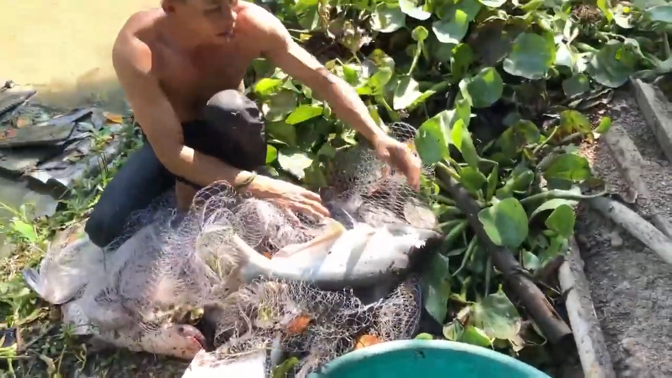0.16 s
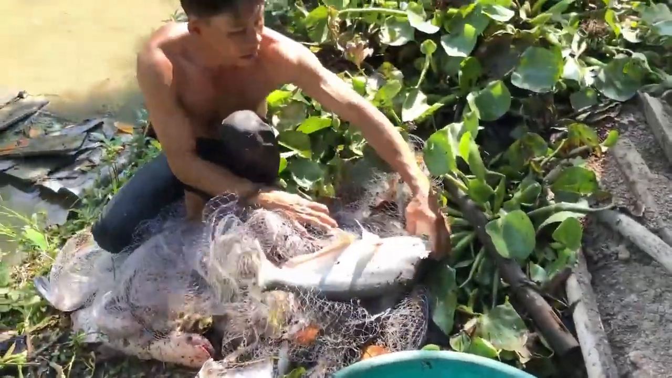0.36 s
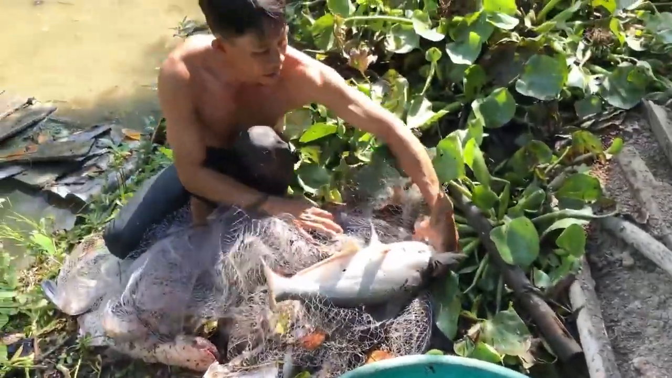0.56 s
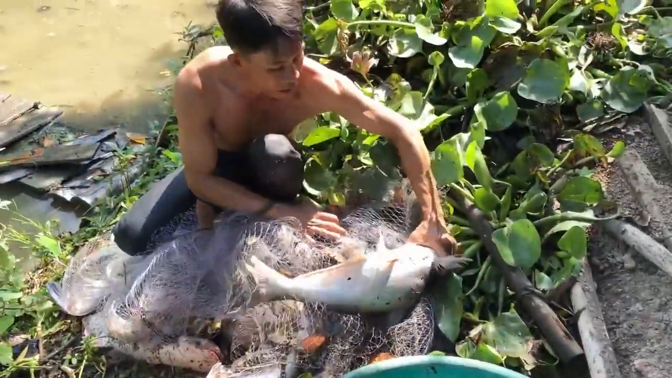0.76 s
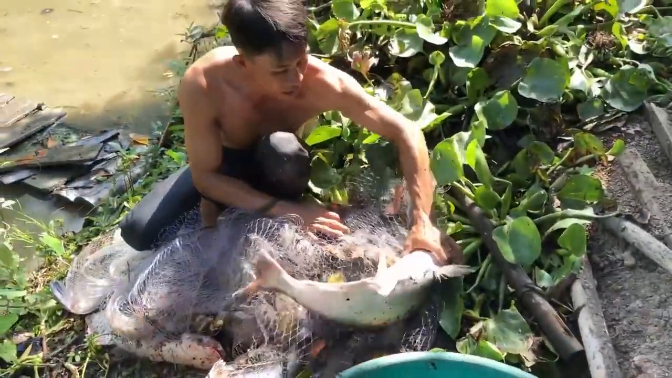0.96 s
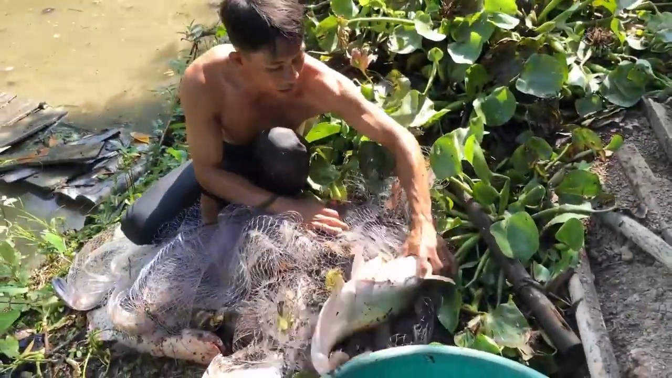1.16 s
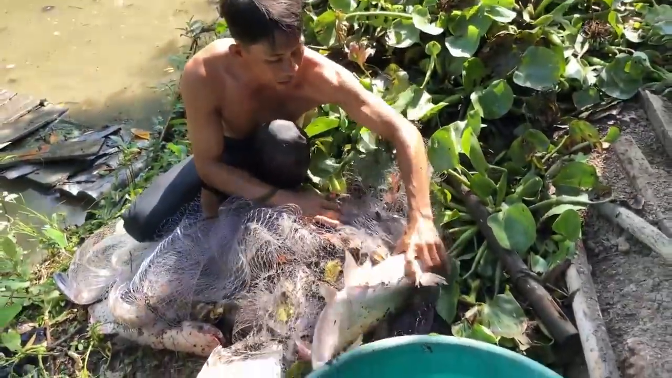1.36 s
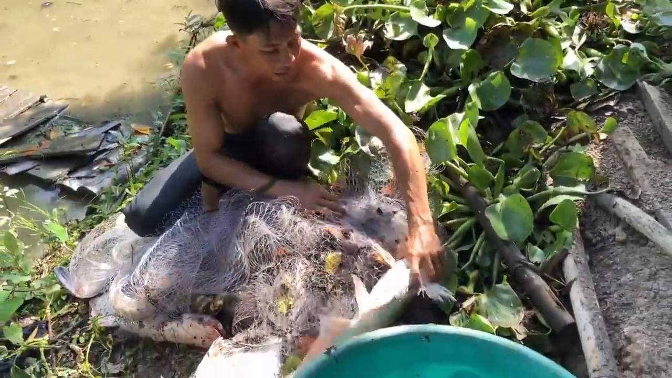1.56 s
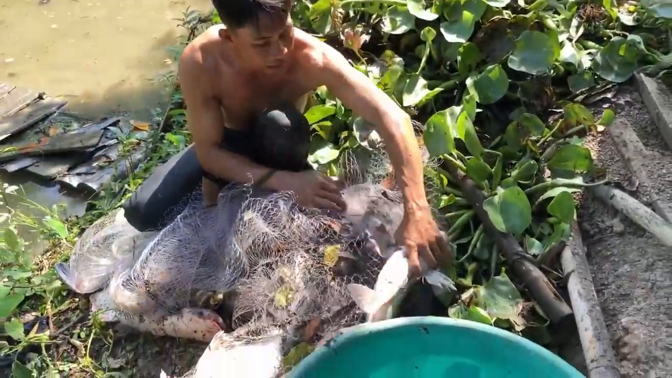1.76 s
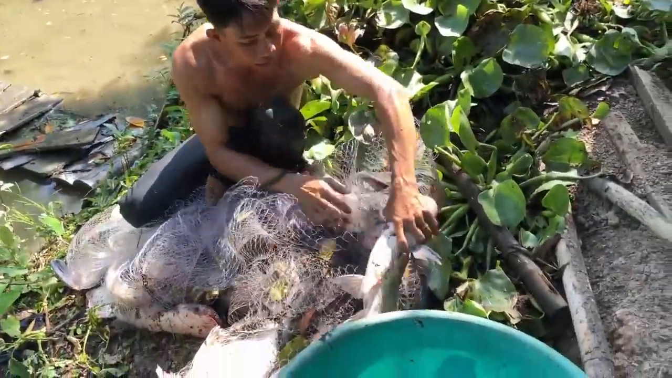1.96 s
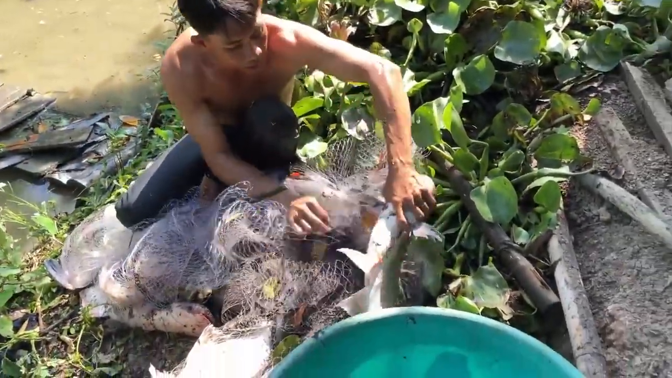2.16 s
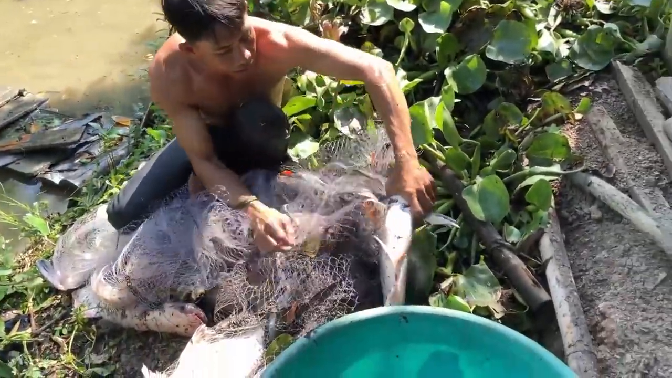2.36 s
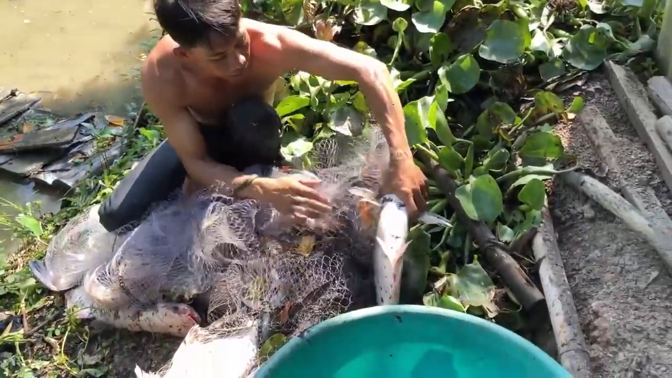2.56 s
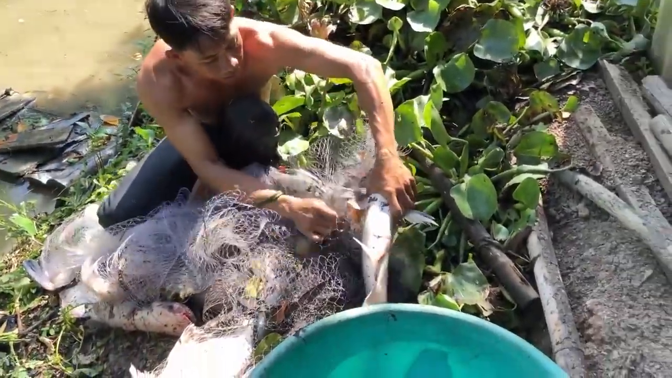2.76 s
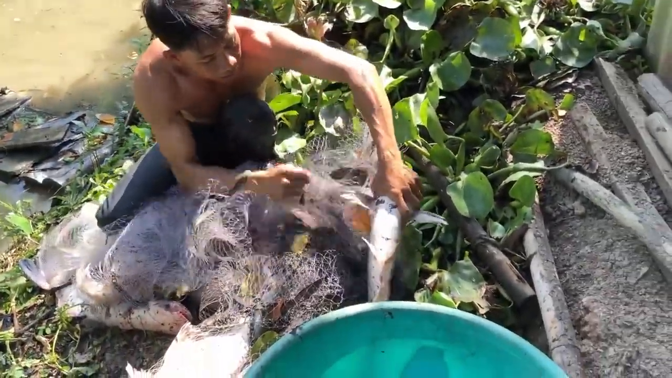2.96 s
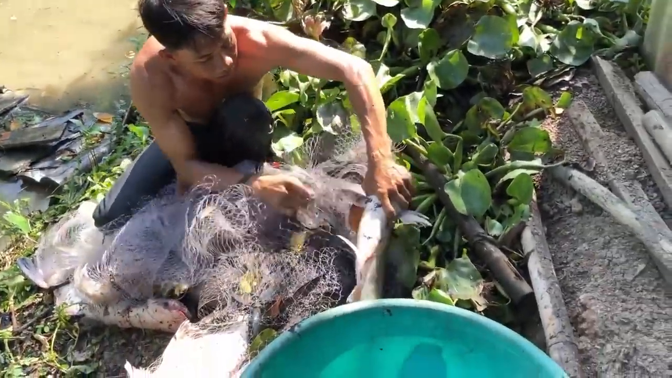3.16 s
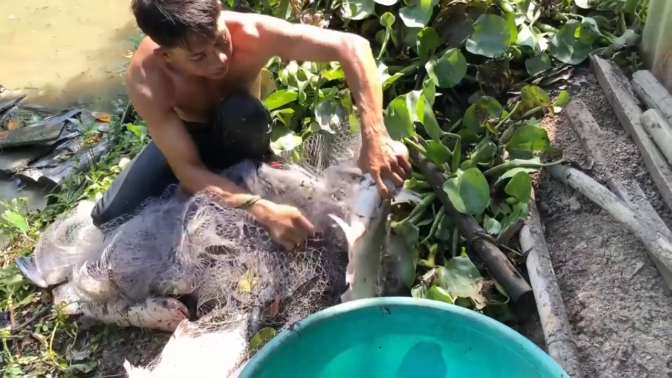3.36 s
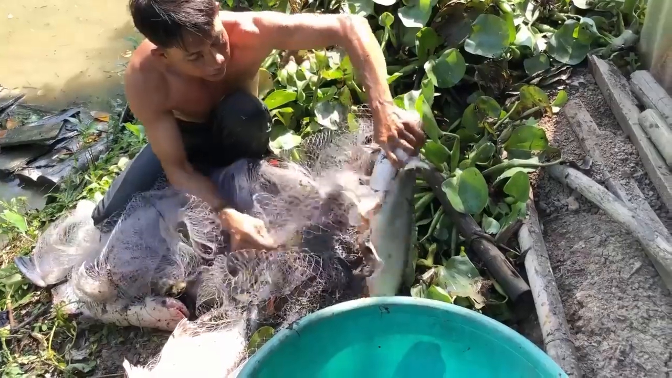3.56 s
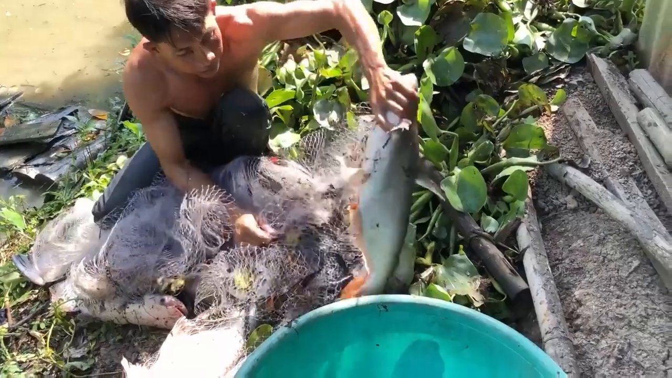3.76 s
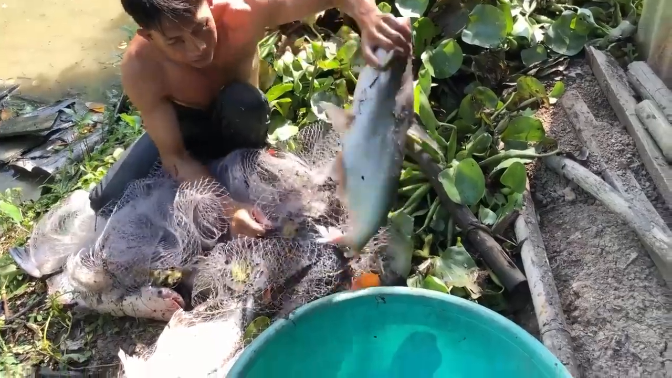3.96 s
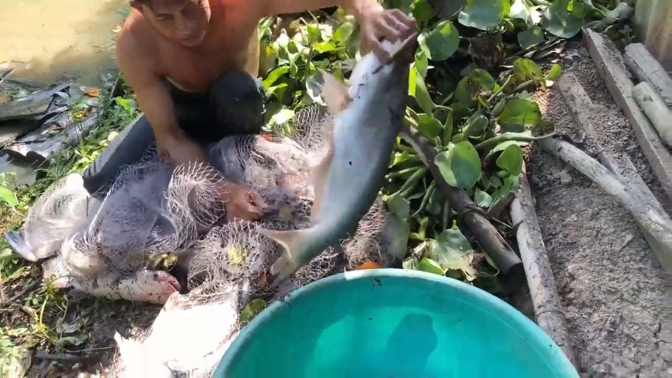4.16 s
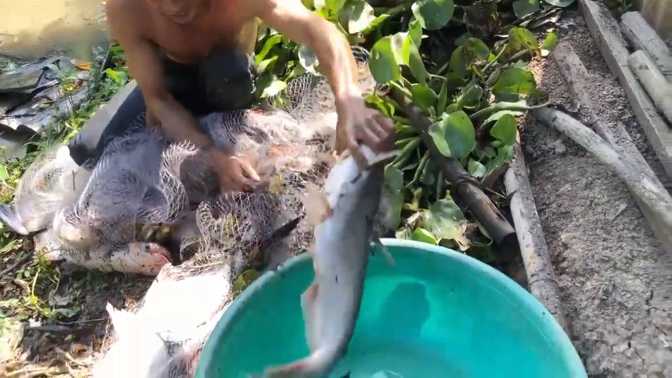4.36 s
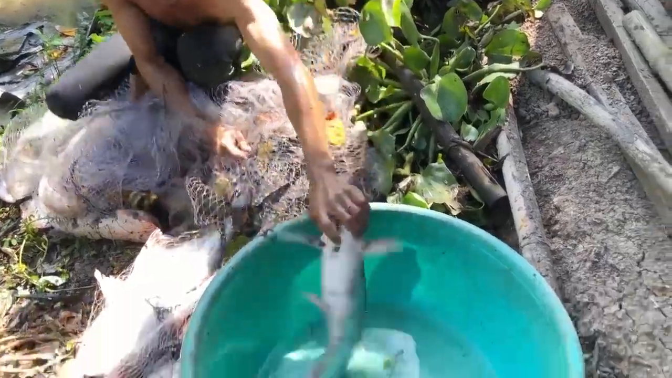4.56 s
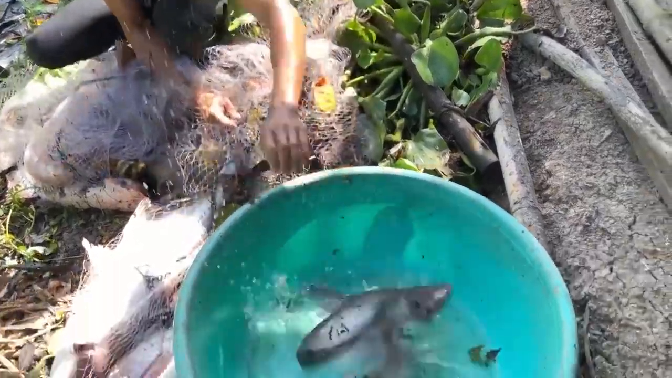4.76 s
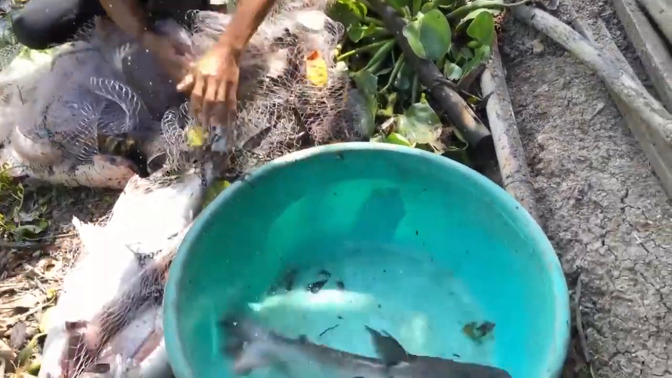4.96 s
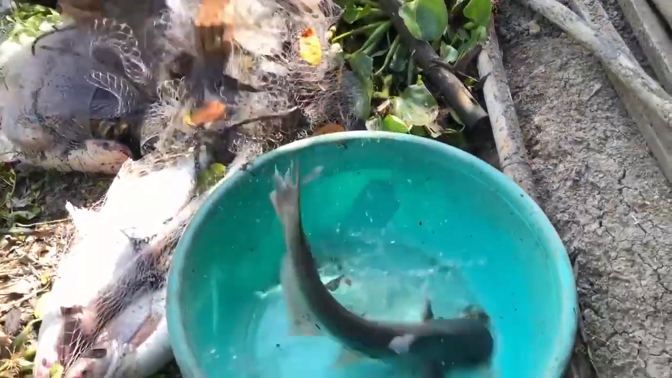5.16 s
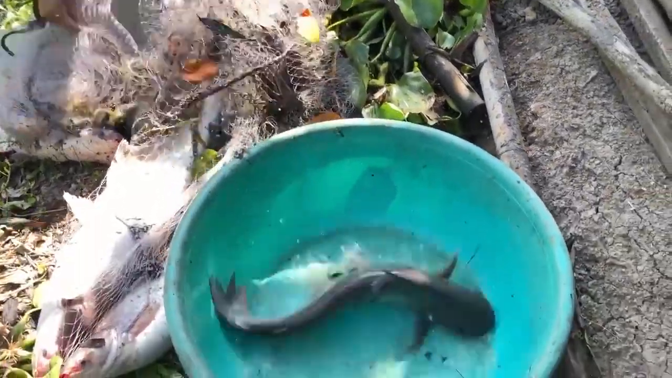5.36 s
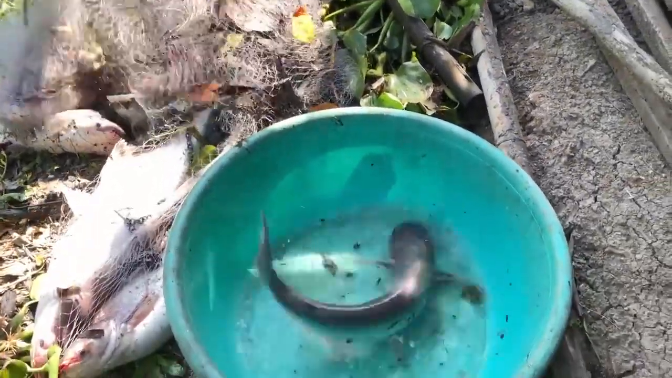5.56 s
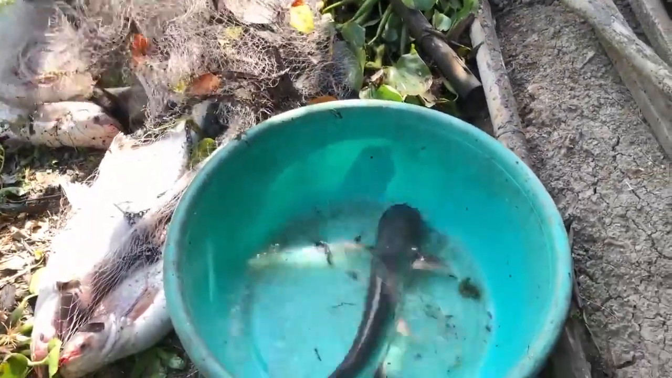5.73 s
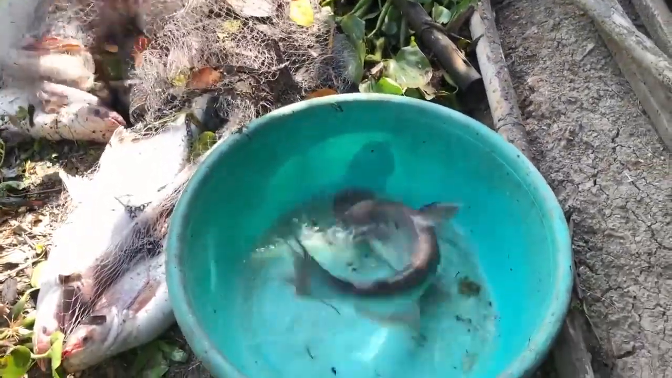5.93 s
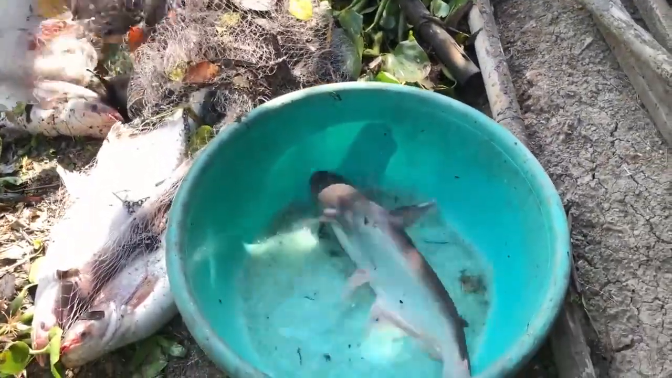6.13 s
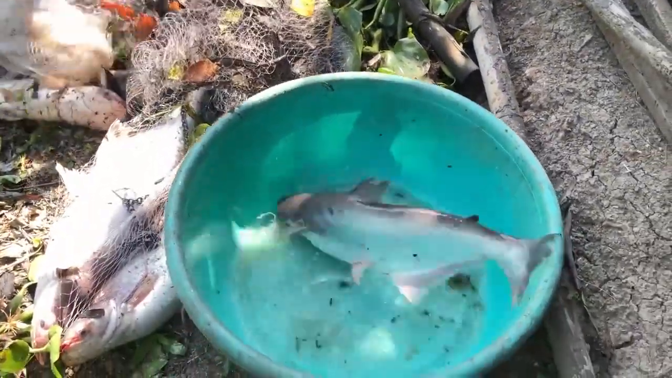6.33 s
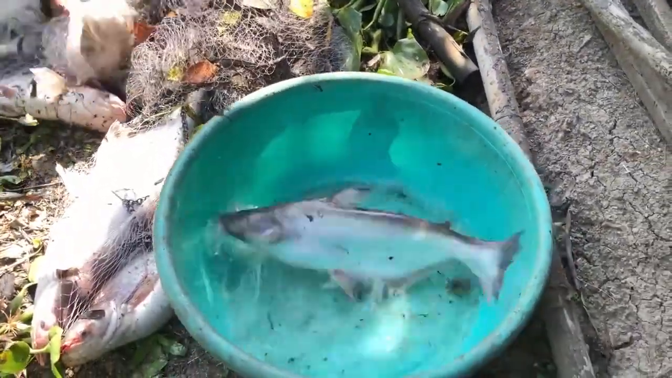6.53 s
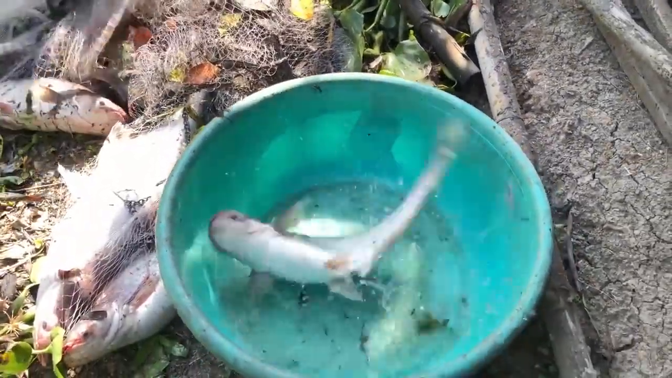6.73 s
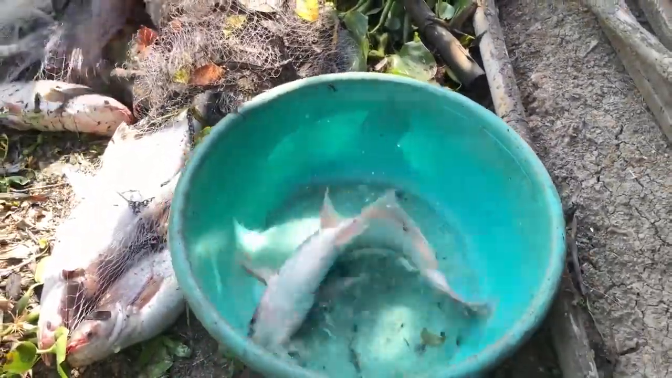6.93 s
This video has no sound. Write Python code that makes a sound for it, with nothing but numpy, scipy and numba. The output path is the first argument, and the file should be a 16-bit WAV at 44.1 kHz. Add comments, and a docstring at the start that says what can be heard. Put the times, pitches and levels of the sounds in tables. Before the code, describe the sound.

Fine crackling and ticks of a net being tugged, quite quiet, over soft open air and a chugging low engine across the water. Suddenly a large fish drops into a basin: a much louder crack, splash and hollow plastic thump. Wet slaps, bubbling spurts, hissing spray and body blows follow in uneven clusters, with brief lulls between, while the engine keeps pulsing beneath. The sound is close, dry and slightly rough at its peaks.

```python
"""A pond bank: a large fish is freed from a nylon net and dropped into a plastic basin with a little water.
The net is crackling noise with ringing snaps and dull flops; water is swarms of dying sinusoids, hiss and slaps.
Body blows and slosh ring the resonances of the basin as the fish thrashes.
Across the pond a single-cylinder boat engine picks up speed: exhaust puffs ring a pipe.
Open air, a distant low drone, a flickering treble shimmer and faint hoots lie around it."""
import sys
import numpy as np
from scipy import signal
from scipy.fft import rfft, irfft
from scipy.io import wavfile
from scipy.ndimage import uniform_filter1d
from numba import njit

SR = 44100
rng = np.random.default_rng(int(sys.argv[2]) if len(sys.argv) > 2 else 0)


def unload_wav(signal):
    """Save mono or channel-first audio to the path in sys.argv[1] as 16-bit WAV at rate SR, clipped to [-1, 1]."""
    wavfile.write(
        sys.argv[1],
        SR,
        np.round(np.clip(np.atleast_2d(signal).T, -1, 1) * 32767).astype(np.int16),
    )


def boost_factor(decibels):
    """Convert a level in decibels to a linear amplitude factor."""
    exponent = np.asarray(decibels, float) / 20
    return 10 ** exponent


N = 312669
T = np.arange(N) / SR
DROPPED_S = 4.68  # the fish lands in the water
NOISE_CREST_DB = 9  # allowance for the peak of a short noise above its rms


def curve(rows):
    """Columns of a breakpoint table, interpolated at every sample."""
    s, *columns = np.transpose(rows)
    return [np.interp(T, s, c) for c in columns]


def unit(x):
    """Scale to rms 1."""
    return x / np.sqrt(np.mean(x ** 2))


def band(x, lo_hz, hi_hz):
    """Band-pass."""
    edges = [lo_hz, min(hi_hz, 0.45 * SR)]
    return signal.sosfilt(signal.butter(2, edges, "band", fs=SR, output="sos"), x)


def ring(x, hz, width_hz):
    """One resonance; a unit impulse makes it ring from amplitude 1."""
    r = np.exp(-np.pi * width_hz / SR)
    w = 2 * np.pi * hz / SR
    return signal.lfilter([0, r * np.sin(w)], [1, -2 * r * np.cos(w), r * r], x)


def walk(rate_hz):
    """Random levels held 1 / rate s and slewed twice; spread near 1."""
    k = max(int(SR / rate_hz), 1)
    held = np.repeat(rng.standard_normal(N + 1)[:N // k + 1], k)
    return 2.1 * uniform_filter1d(uniform_filter1d(held, k), k)[:N]


def coloured(points):
    """Steady noise with the given spectrum, at rms 1."""
    hz, db = np.transpose(points)
    f = np.fft.rfftfreq(N, 1 / SR) + 1  # 1 Hz up, to keep the logarithm finite
    gain = boost_factor(np.interp(np.log(f), np.log(hz), db, left=-90))
    return unit(irfft(rfft(rng.standard_normal(N)) * gain, N))


@njit
def grains(n, start, hz, cycles, size, glide):
    """Dying sinusoids; a glide above 1 makes their pitch climb, as in small bubbles."""
    out = np.zeros(n)
    for k in range(len(start)):
        step = 2 * np.pi * hz[k] / SR
        length = int(5 * cycles[k] * SR / hz[k])
        fade = np.exp(-5 / length)
        climb = glide ** (1 / length)
        level = size[k]
        phase = 0.
        for i in range(start[k], min(start[k] + length, n)):
            out[i] += level * np.sin(phase)
            level *= fade
            phase += step
            step = min(step * climb, 2.6)
    return out


def scatter(count, lo_hz, hi_hz, cycles, spread_db, glide):
    """Grains at random times and pitches, some louder than the rest, at rms 1 together."""
    when, pitch, length, loud = rng.random((count, 4)).T
    start = (when * N).astype(np.int64)
    hz = lo_hz * (hi_hz / lo_hz) ** pitch
    size = boost_factor(-spread_db * np.log(loud + 0.02))
    return unit(grains(N, start, hz, cycles * (0.5 + length), size, glide))


def add(out, s, x):
    """Mix x into out at time s."""
    i = max(int(s * SR), 0)
    out[i:i + len(x)] += x[:N - i]


def swells(start, hold, db, rise, fall):
    """Gain of overlapping events that rise to db, hold, then fade, at fixed dB per second."""
    power = np.zeros(N)
    for s, h, d in zip(start, hold, db):
        before = np.maximum(s - T, 0)
        after = np.maximum(T - s - h, 0)
        power += boost_factor(2 * (d - rise * before - fall * after))
    return np.sqrt(power)


def burst(db, hz, hiss_db, lasts, t60):
    """A trapped pocket of air rings with a climbing pitch; long spurts are many pockets, so rougher; a crack on top."""
    t = np.arange(4096) / SR
    a, b, c = rng.standard_normal((3, len(t)))
    lasts = max(lasts, 4e-4)
    attack = np.minimum(t / min(0.34 * lasts, 0.0007), 1)
    decay = np.exp(-np.log(1000) * np.maximum(t - lasts, 0) / max(t60, 0.004))
    shape = attack * decay
    tone = 1.25 * np.exp(-lasts / 0.0051) * np.sin(2 * np.pi * hz * t * (1 + 2.9 * t))
    rough = unit(band(a, hz / 1.16, hz * 1.16))
    overtones = unit(band(band(c, 1.4 * hz, 2.2 * hz), 1.2 * hz, 2.4 * hz))
    body = shape * (tone + 0.84 * rough + 0.43 * overtones)
    sharp = 1 + np.exp(-t / 0.00085)  # sharpest at first contact
    crack = shape * sharp * unit(band(b, 1550, 15600))
    return boost_factor(db) * (body / np.abs(body).max() + boost_factor(hiss_db - NOISE_CREST_DB) * crack)


# spectrum of the open air over the pond: hz, level_db (per Hz, relative)
AIR = [(30, -28), (60, -3), (130, 2), (250, -5), (480, -12.5), (750, -16.5), (1200, -25.5), (3400, -21.5),
       (10700, -56), (15500, -69)]


def open_air():
    """Steady broadband noise, weighted to the low end."""
    return boost_factor(-49) * coloured(AIR)


# fade of the distant low drone: time_s, level_db
RUMBLE = [(0, -50), (.5, -48), (.9, -50), (1.25, -49), (1.5, -62), (7.09, -66)]


def drone():
    """Noise through one narrow deep resonance makes a wavering low note."""
    return boost_factor(curve(RUMBLE)[0]) * unit(ring(rng.standard_normal(N), 51, 6.8))


# hard resonances a snap sets off: pitch_hz, width_hz, level_db (before a random spread)
KNOT = [(595, 280, -4), (2200, 760, -14), (3180, 720, -26), (4120, 520, -3), (5270, 500, -1),
        (6600, 680, 4), (9500, 700, 3)]


def snap(db, hz, crack_db, t60):
    """A knot or float jerks tight: a low ring, and a tick that sounds its hard modes, each time differently."""
    tick = np.zeros(4096)
    tick[8] = 1
    spread = 3.5 * rng.standard_normal(len(KNOT))  # dB
    hard = sum(boost_factor(mode_db + g) * ring(tick, f, w) for (f, w, mode_db), g in zip(KNOT, spread))
    return burst(db, hz, crack_db, 0.0012, t60) + boost_factor(db + crack_db - 6.5) * hard


# how hard the hands work at the net: time_s, rustle_db
NET_EFFORT = [(0, -53), (.24, -53.5), (.6, -53), (1.2, -51), (1.85, -51.5), (2.5, -48.5), (3.1, -47),
              (3.9, -49), (4.35, -49), (4.64, -45)]
# single tugs on the net: start_s, hold_s, rustle_db
TUGS = [(0.11, 0.024, -54), (.38, .04, -58), (.66, 0.064, -53), (1.177, 0.11, -53), (1.57, .05, -50),
        (1.897, .04, -51.5), (2.03, 0.029, -52.5), (2.29, 0.044, -48.5), (2.607, 0.1, -44.5),
        (2.854, 0.05, -49.5), (3.303, 0.046, -46), (3.49, 0.044, -47), (3.724, 0.065, -49.5),
        (3.9, 0.16, -45), (4.137, 0.088, -48.5)]
TUG_RISE_DB_S, TUG_FALL_DB_S = 148, 134
# knots and floats snapping: start_s, ring_peak_db, pitch_hz, crack_db (against the ring), t60_s
SNAPS = [(0.477, -43.5, 1880, 10, 0.04), (1.0023, -39, 1340, -19, 0.03), (1.022, -30.5, 1390, -5.5, 0.016),
         (1.05, -29, 1370, -3.5, 0.021), (1.0763, -30.5, 1420, -4.5, 0.016), (1.1029, -44, 1420, -13, 0.03),
         (1.135, -40, 1310, 2, 0.021), (1.268, -35, 3600, -18, 0.021), (1.2817, -29.5, 1410, -10, 0.051),
         (1.877, -34.5, 5530, -24, 0.11), (2.0758, -41, 2230, 4, 0.03), (2.1296, -41, 1590, -18, 0.03),
         (2.255, -38, 2000, -2, 0.052), (2.2792, -35, 4860, 1, 0.04), (2.7312, -39, 1840, 8.5, 0.038),
         (2.8968, -44, 1040, 10.5, 0.045), (2.9549, -27, 1370, 6.5, 0.017), (3.0005, -32, 1400, -5, 0.021),
         (3.0595, -37.5, 1590, 7.5, 0.067), (3.286, -43, 1880, -4, 0.037), (3.4361, -38, 3590, -10, 0.026),
         (3.4482, -34.5, 1680, -9, 0.038), (3.4753, -31.5, 1390, 1, 0.035), (3.5062, -31, 1600, 3, 0.072),
         (3.699, -35, 3330, 5.5, 0.049), (3.9, -35, 2470, 2, 0.16)]
# the fish flopping on the heap of net: start_s, peak_db (approximate), pitch_hz, half_length_s
FLOPS = [(0.964, -41, 790, 0.043), (1.017, -34, 275, 0.014), (1.058, -36.5, 262, 0.029),
         (1.145, -39, 330, 0.043), (1.159, -37, 695, 0.012), (1.26, -55, 217, 0.02),
         (1.293, -37, 800, 0.017), (3.757, -34.5, 910, 0.012)]


def net():
    """Wet mesh dragging over leaves: a fine crackle, single snaps, and dull flops of the fish."""
    tugs = swells(*np.transpose(TUGS), TUG_RISE_DB_S, TUG_FALL_DB_S)
    pull = np.hypot(boost_factor(curve(NET_EFFORT)[0]), tugs)
    crackle = scatter(count=12000, lo_hz=700, hi_hz=14000, cycles=1.5, spread_db=3.0, glide=1.)
    drag = (rng.standard_normal(N) + 0.5 * crackle) * boost_factor(0.85 * walk(40))
    rustle = unit(band(drag, 450, 11400))
    fine_hiss = boost_factor(-13) * unit(band(drag, 9160, 16500))
    out = (T < DROPPED_S) * pull * (rustle + fine_hiss)
    for s, peak_db, hz, crack_db, t60 in SNAPS:
        add(out, s, snap(peak_db, hz, crack_db, t60))
    for s, peak_db, hz, half_s in FLOPS:
        n = int(2 * half_s * SR)
        thud = unit(ring(rng.standard_normal(4096), hz, hz / 2.9))[:n]
        add(out, s, boost_factor(peak_db - NOISE_CREST_DB) * np.hanning(n) ** 0.5 * thud)
    return out


# the treble flickers: start_s, hold_s, level_db (before a random flutter)
FLICKERS = [(0.146, .03, -60), (.32, 0.014, -58), (0.487, 0.049, -51), (0.595, 0.014, -53),
            (1.205, 0.063, -56), (1.67, .06, -56), (1.9, .015, -64), (1.99, 0.036, -55), (2.08, .03, -63),
            (2.28, .06, -52), (3.11, 0.044, -48), (3.21, .08, -54), (3.49, .09, -52), (3.7, 0.073, -57),
            (5.139, 0.043, -36), (5.23, .3, -45), (5.575, 0.15, -32), (5.75, .06, -42), (5.85, .02, -35),
            (5.91, 0.19, -39), (6.208, 0.12, -34), (6.36, 0.13, -40), (6.7, 0.13, -38)]
FLICKER_RISE_DB_S, FLICKER_FALL_DB_S, FLICKER_REST_DB = 400, 250, -74


def shimmer():
    """A narrow, flickering hiss at the very top: noise through the same resonance twice."""
    hiss = ring(ring(rng.standard_normal(N), 15350, 600), 15350, 600)
    flickers = swells(*np.transpose(FLICKERS), FLICKER_RISE_DB_S, FLICKER_FALL_DB_S)
    flutter = boost_factor(2.5 * walk(60))
    return (boost_factor(FLICKER_REST_DB) + flickers) * flutter * unit(hiss)


# boat engine speed: time_s, rate_hz (firings per second)
ENGINE_SPEED = [(0.0, 10.582), (0.8, 10.274), (1.45, 9.844), (1.8, 10.974), (2.3, 12.268), (2.9, 13.83),
                (3.5, 14.175), (4.1, 15.0), (4.8, 15.433), (5.3, 15.765), (5.8, 15.162), (6.4, 15.073),
                (7.1, 14.956)]
# boat engine load: time_s, firing_db
ENGINE_LOAD = [(0, -80), (.7, -50.5), (1.3, -49), (1.55, -37), (1.9, -35), (2.3, -32.5), (2.75, -33),
               (3.2, -35.5), (3.6, -36), (4.0, -33.5), (4.5, -35), (5.0, -34), (5.6, -38), (6.2, -34),
               (7.09, -35)]
# exhaust pipe resonances: pitch_hz, width_hz, level_db (before the tilt with speed)
EXHAUST = [(72, 20, -8.5), (102.7, 28.7, -1.5), (133.8, 8.3, -12), (170, 25, -11)]
VALVE_LEAD_S, PUFF_S = 0.00429, 0.0049
DIP_LEAD_S, DIP_DB = 0.0028, -12.5
LATE_CYCLES = 0.11  # each mode speaks this share of its own cycle late
CRUISE_HZ, PIVOT_HZ, BRIGHTEN_DB = 10.2, 131, 0.5  # dB per octave for each extra firing a second
BARK_ORDER, BARK_S, BARK_DB, BARK_DELAY_S = 17.45, 0.028, -7, 0.00451  # order: multiple of the firing rate


def engine():
    """One soft exhaust puff per firing rings the pipe; deep modes come late; an upper bark follows the speed."""
    speed = curve(ENGINE_SPEED)[0]
    firings = np.flatnonzero(np.diff(np.floor(np.cumsum(speed) / SR)))
    opens = firings - int(VALVE_LEAD_S * SR)
    puffs = np.zeros(N)
    puffs[opens] = boost_factor(0.5 * rng.standard_normal(len(opens)))
    puffs[opens - int(DIP_LEAD_S * SR)] -= boost_factor(DIP_DB)  # the pressure dips just ahead of the blast
    soft = np.convolve(puffs, np.hanning(int(PUFF_S * SR)) / (0.00083 * SR))[:N]
    pipe = np.zeros(N)
    for hz, width, db in EXHAUST:
        tilt_db = BRIGHTEN_DB * (speed - CRUISE_HZ) * np.log2(hz / PIVOT_HZ)
        pipe += boost_factor(db + tilt_db) * np.roll(ring(soft, hz, width), int(LATE_CYCLES * SR / hz))
    t = np.arange(-BARK_S / 2, BARK_S / 2, 1 / SR)
    for i in opens:
        bark = np.hanning(len(t)) * np.cos(2 * np.pi * BARK_ORDER * speed[i] * t)
        add(pipe, i / SR + BARK_DELAY_S - BARK_S / 2, boost_factor(BARK_DB) * puffs[i] * bark)
    return boost_factor(curve(ENGINE_LOAD)[0]) * pipe


# faint hoots far away: start_s, end_s, pitch_hz (centre), level_db (centre)
HOOTS = [(3.9, 4.06, 517, -48.5), (4.298, 4.57, 545, -53), (4.436, 4.614, 807, -53)]


def hoots():
    """Soft tones whose pitch and level waver."""
    out = np.zeros(N)
    for start, end, hz, db in HOOTS:
        n = int((end - start) * SR)
        level = boost_factor(db + 3 * walk(25)[:n]) * np.hanning(n) ** 0.5
        pitch = hz * (1 + 0.008 * walk(30)[:n])
        add(out, start, level * np.sin(2 * np.pi * np.cumsum(pitch) / SR))
    return out


# surges of water thrown up by the fish: start_s, hold_s, splash_db, spray_db, slosh_db (all mix gains)
SURGES = [(4.693, 0.0069, -33, -42.5, -24), (4.765, 0.029, -31.5, -38, -26.5),
          (4.832, 0.017, -38, -49, -33), (4.929, 0.052, -34, -44, -38), (5.052, .02, -29, -36, -32),
          (5.09, 0.053, -25.5, -30.5, -23), (5.17, 0.07, -37, -38.5, -32.5),
          (5.328, 0.051, -38.5, -38.5, -55), (5.43, 0.025, -34, -35.5, -27.5),
          (5.479, 0.082, -28, -37.5, -33.5), (5.594, 0.064, -33, -32, -34.5), (5.678, 0.024, -33, -56, -41),
          (5.826, .05, -37.5, -37, -36.5), (5.948, 0.027, -39.5, -35, -36),
          (6.029, 0.048, -25.5, -35, -28.5), (6.078, 0.043, -34, -44, -31), (6.181, 0.082, -33.5, -37, -39),
          (6.411, 0.031, -28.5, -38, -19.5), (6.485, 0.042, -33, -37, -44), (6.613, 0.032, -31, -38, -28.5),
          (6.675, 0.02, -23.5, -32.5, -27.5), (6.723, 0.045, -37, -37, -35), (6.841, 0.066, -37, -35, -36),
          (6.945, 0.015, -28, -34.5, -33.5), (6.987, 0.031, -30, -35, -28.5),
          (7.069, .03, -31.5, -34, -22.5)]
SURGE_RISE_DB_S, SURGE_FALL_DB_S = 418, 226
# gains of the water between surges, one each for: splash_db, spray_db, slosh_db
LAPPING_DB = [-42.5, -43, -45]
# tail and fin slaps, plops, spurts: start_s, ring_peak_db, pitch_hz, spray_db (peak against the ring), length_s
SLAPS = [(4.621, -26.5, 1900, -6, 0.0048), (4.652, -27.5, 2290, -25, .007), (4.686, -15, 2650, 1, 0.0097),
         (4.711, -28, 2390, 6, 0.0065), (4.749, -16.5, 2170, -5.5, 0.007), (4.768, -7.5, 866, -7, 0.015),
         (4.775, -10.5, 2700, -7, 0.0034), (4.798, -2, 2400, -5.5, 0.0026),
         (4.809, -17.5, 3000, -3, 0.0042), (4.848, -21, 1200, -6, 0.0015), (4.855, -17, 3520, -8, 0.0023),
         (4.872, -24.5, 4960, 5.5, 0.0021), (4.928, -27.5, 1100, 4.5, 0.016),
         (4.953, -21.5, 950, -5, .0065), (4.994, -21.5, 5530, -8, 0.0028),
         (5.016, -18.5, 1950, -22, 0.0022), (5.052, -14, 1420, -1, 0.0032), (5.092, -14, 2900, -8, .007),
         (5.102, -9, 2050, 0.5, 0.0093), (5.107, -12.5, 976, -11, 0.0092), (5.114, -2.5, 2850, -10, 0.0028),
         (5.246, -18, 3180, -11, 0.0011), (5.267, -22, 3180, -4, 0.0022), (5.288, -16.5, 1220, -8, 0.0054),
         (5.308, -20, 3060, -4, 0.0022), (5.3185, -5, 7470, -14, 0.00073), (5.341, -21, 4060, 4, .003),
         (5.444, -14.5, 2760, -16, .001), (5.457, -21, 3300, -1, 0.0042), (5.482, -18, 2830, 3.5, 0.0012),
         (5.489, -12.5, 1920, -13, 0.0042), (5.503, -14.5, 2430, -26, .0025),
         (5.517, -23.5, 4570, 3.5, 0.0055), (5.572, -23, 2210, -12, .006),
         (5.622, -17.5, 3800, -0.5, 0.0076), (5.664, -14.5, 3300, -3.5, .003),
         (5.705, -15.5, 7850, -9, 0.0022), (5.8, -32, 2360, 7, 0.0041), (5.818, -8.5, 2840, -0.5, 0.00098),
         (5.819, -15, 1240, -11, 0.0032), (5.825, -15, 2600, -13, 0.0041), (5.849, -20, 2980, 4, 0.01),
         (5.882, -26, 2650, 5, 0.015), (5.953, -21, 1100, -6, 0.0014), (5.98, -23, 1270, 0, 0.0045),
         (5.995, -21, 2060, -17, .002), (6.019, -24, 5700, 3, 0.0054), (6.035, -9, 1160, -6.5, .0026),
         (6.048, -8.5, 1460, -14, 0.0025), (6.051, -13, 905, -23, .009), (6.084, -17, 1200, -5, 0.0028),
         (6.119, -13.5, 1700, -7, .0012), (6.204, -17.5, 2740, -16, 0.0036), (6.215, -22, 1970, -9, .004),
         (6.237, -24, 1430, 5.5, 0.0071), (6.286, -22, 1280, -11, 0.021), (6.39, -24, 1610, 5.5, 0.0027),
         (6.4012, -15, 1260, -3, 0.013), (6.429, -15, 870, -10.5, 0.008), (6.444, -14, 646, -31, 0.0072),
         (6.475, -15, 2600, -10, 0.0013), (6.4776, -8, 1076, -31, 0.0078), (6.488, -23, 1260, -16, 0.0045),
         (6.5513, -15, 4270, -32, 0.00037), (6.569, -24.5, 1250, -6, .003), (6.6359, -3, 2360, -18, 0.0018),
         (6.6362, -1.5, 1690, -42, 0.0037), (6.652, -18, 820, -2, 0.014), (6.686, -12.5, 2850, 6, .005),
         (6.696, -15.5, 746, -5, 0.014), (6.7136, -7, 1760, -10, 0.00098), (6.761, -20.5, 2350, -23, .002),
         (6.79, -24.5, 1080, -22, 0.0057), (6.85, -25, 810, 5, 0.0052), (6.892, -13, 1280, 1, 0.0055),
         (6.94, -18, 700, -20, 0.0027), (6.947, -11.5, 1580, 0.5, .002), (6.982, -20, 860, 8, 0.0076),
         (7.006, -15, 710, -18, 0.0049), (7.043, -15, 1040, -3.5, 0.0025), (7.079, -8.5, 1170, -12, 0.0048)]
SLAP_T60_S, SLAP_TAIL, SLAP_CYCLES = 0.01, 1.95, 6.4  # t60 = base + tail x length + cycles / pitch


def water():
    """Bubbles and spray follow the thrashing in quick spurts; returns the splash and the slosh that pushes the wall."""
    start, hold, *levels = np.transpose(SURGES)
    splash_gain, spray_gain, slosh_gain = (
        np.hypot((T > DROPPED_S) * boost_factor(rest_db), swells(start, hold, db, SURGE_RISE_DB_S, SURGE_FALL_DB_S))
        for db, rest_db in zip(levels, LAPPING_DB))
    bubbles = scatter(count=7000, lo_hz=700, hi_hz=4800, cycles=3.5, spread_db=3.2, glide=1.15)
    fizz = scatter(count=20000, lo_hz=3500, hi_hz=15000, cycles=3.0, spread_db=3.5, glide=1.15)
    rush = rng.standard_normal(N)
    spurts = 1.3 * walk(90)  # dB
    splash = splash_gain * boost_factor(spurts) * (0.85 * bubbles + 0.5 * unit(band(rush, 700, 5000)))
    spray_mix = 0.76 * fizz + 1.05 * unit(band(rush, 2270, 15700))
    spray = spray_gain * boost_factor(spurts + 1.1 * walk(90)) * spray_mix
    out = splash + spray
    for s, db, hz, spray_db, lasts in SLAPS:
        t60 = SLAP_T60_S + SLAP_TAIL * lasts + SLAP_CYCLES / hz
        add(out, s, burst(db, hz, spray_db, lasts, t60))
    gurgle = scatter(count=900, lo_hz=335.5, hi_hz=1100, cycles=1.52, spread_db=4.0, glide=1.09)
    slosh = slosh_gain * (0.52 * gurgle + 0.32 * unit(band(rng.standard_normal(N), 249, 1380)))
    return out, slosh


# the body striking the basin: start_s, peak_db, contact_s (at half the full force)
BLOWS = [(4.656, -22.5, 0.00074), (4.688, -26, 0.0017), (4.7499, -4.5, 0.0011), (4.7528, -3.5, 0.00067),
         (5.113, -24, 0.0072), (5.167, -15.5, 0.00033), (5.202, -44, 0.0006), (5.527, -17.5, 0.00088),
         (5.531, -20.5, 0.0029), (5.551, -19, 0.011), (6.038, -34, 0.0019), (6.083, -21, 0.003),
         (6.088, -16, 0.0043), (6.152, -16, 0.00052), (6.387, -37, 0.0016), (6.404, -10.5, 0.00078),
         (6.406, -10.5, 0.0034), (6.4113, -8.5, 0.0057), (6.429, -19, 0.0011), (6.453, -15, 0.00055),
         (6.69, -12.5, 0.00054), (6.713, -13.5, 0.0036), (6.72, -23, 0.0014), (6.749, -21.5, 0.00096),
         (6.946, -21, 0.0037), (6.988, -25, 0.00061), (7.039, -27, 0.0006)]
# resonances of the plastic shell: pitch_hz, width_hz, level_db (relative; each blow varies it)
BASIN = [(65.4, 75, -23), (112, 55, 9), (163, 78, 10), (253.6, 46, 3), (330, 53, -7), (436, 45, 3),
         (618, 150, 9.5), (873, 33, -10.5)]


def basin(slosh):
    """Blows and slosh ring the plastic shell; a long soft contact reaches only the low modes."""
    wall = sum(boost_factor(db) * ring(slosh, hz, w) for hz, w, db in BASIN)
    out = 0.59 * slosh + boost_factor(-41.5) * wall
    spots = rng.standard_normal((len(BLOWS), len(BASIN)))
    for (s, db, contact), spot in zip(BLOWS, spots):
        touch = np.hanning(max(int(2 * contact * SR), 4))
        push = np.gradient(np.pad(touch, (0, 8192)))  # the shell radiates the change of the force
        knock = np.zeros(len(push))
        for (hz, width, mode_db), g in zip(BASIN, spot):
            # a quick local rap barely moves the whole floor, so it weakens the deepest modes
            reach = min(0.77 * hz * contact, 1)
            knock += boost_factor(mode_db + 1.7 * g) * reach * ring(push, hz, width)
        add(out, s, -boost_factor(db) * knock / np.abs(knock).max())
    return out


def scene():
    """Everything reaches one microphone in the open."""
    splash, slosh = water()
    background = open_air() + drone() + hoots()
    return (background + net() + shimmer() + engine() + splash + basin(slosh))[None]


def roll_off(x):
    """The treble ends steeply here."""
    return signal.sosfilt(signal.butter(12, 16830, fs=SR, output="sos"), x)


def record(dry):
    """The deep bass is filtered off without smearing the puffs, the top is cut, peaks clip."""
    x = signal.sosfiltfilt(signal.butter(4, 52, "high", fs=SR, output="sos"), dry)
    x = signal.sosfilt(signal.ellip(12, 0.3, 70, 15720, fs=SR, output="sos"), x)
    mix = np.clip(x, -0.99, 0.99)
    return roll_off(mix)


dry = scene()
out = record(dry)
unload_wav(out)
```